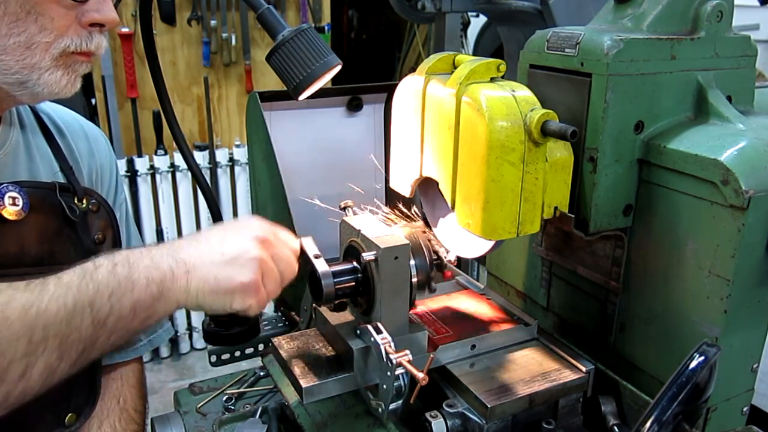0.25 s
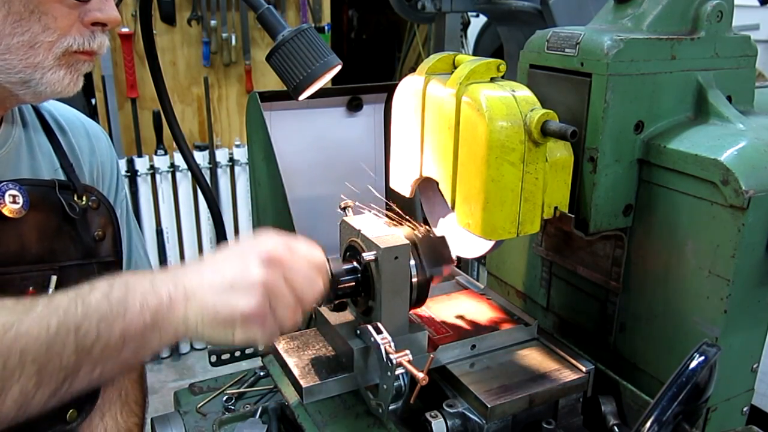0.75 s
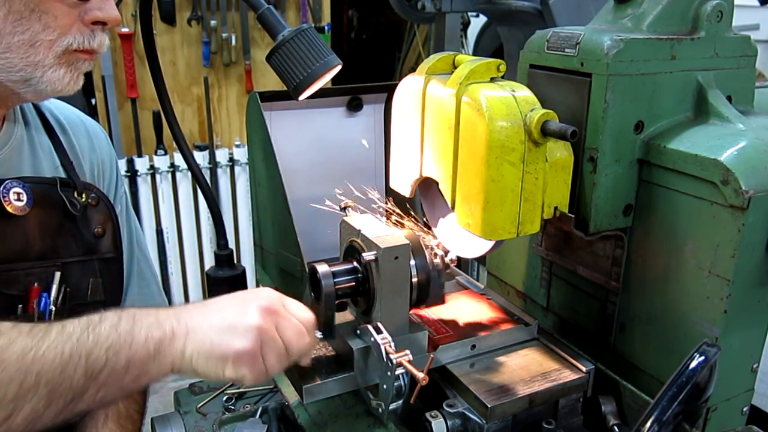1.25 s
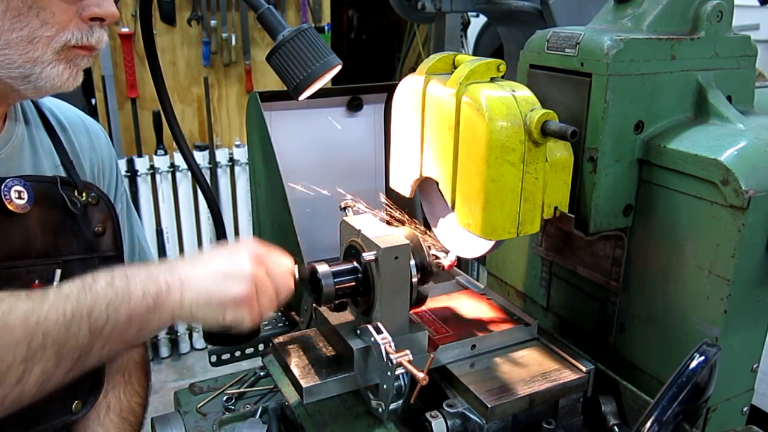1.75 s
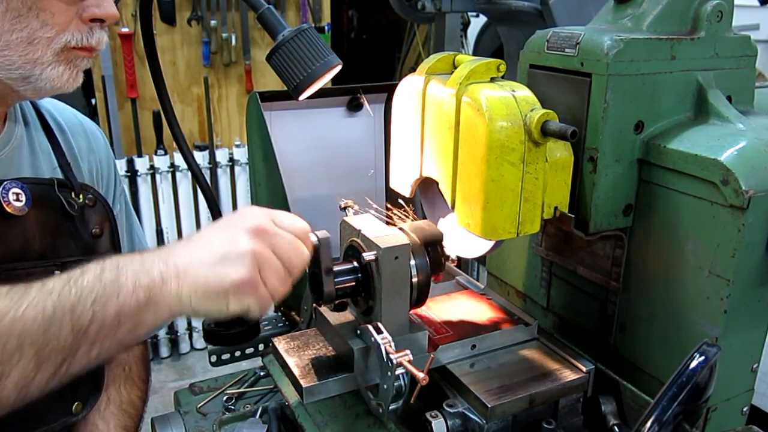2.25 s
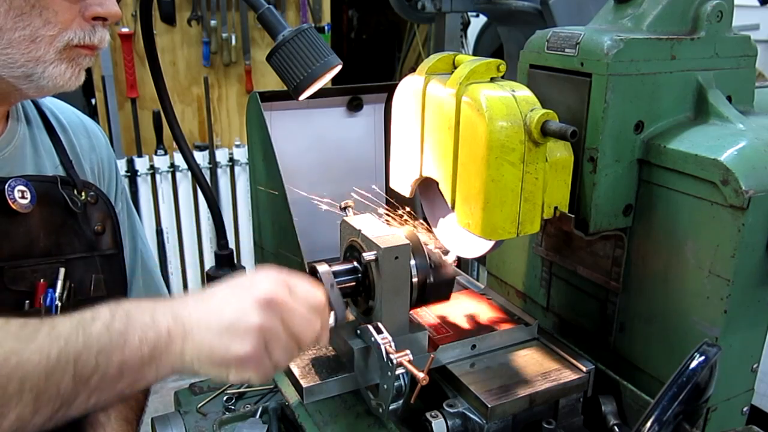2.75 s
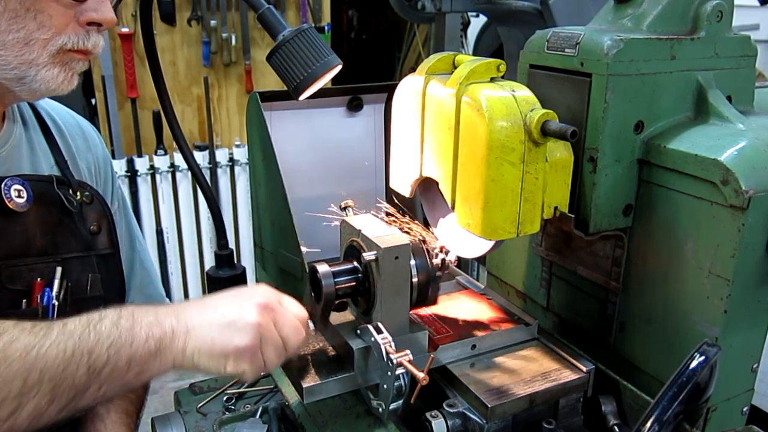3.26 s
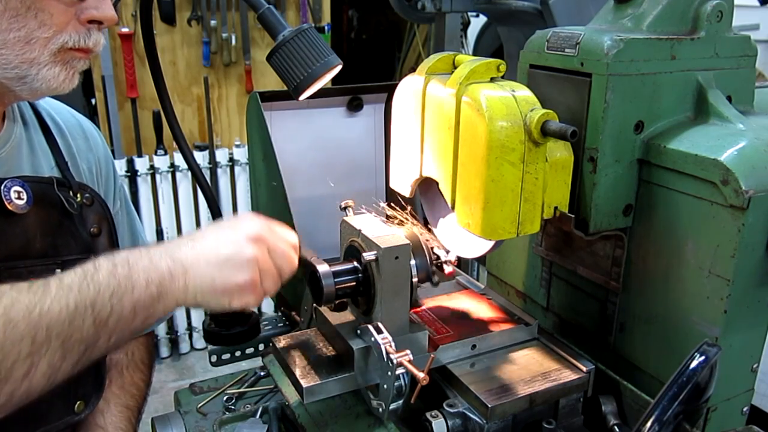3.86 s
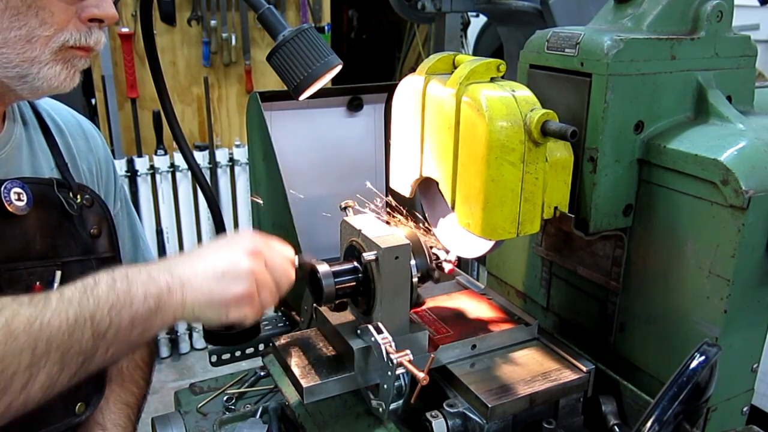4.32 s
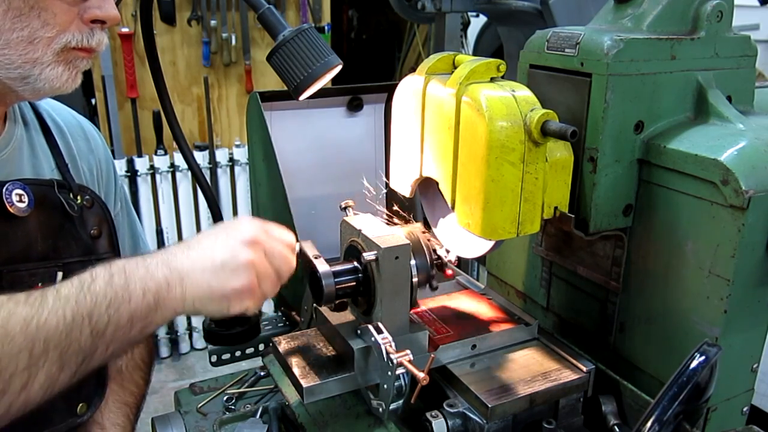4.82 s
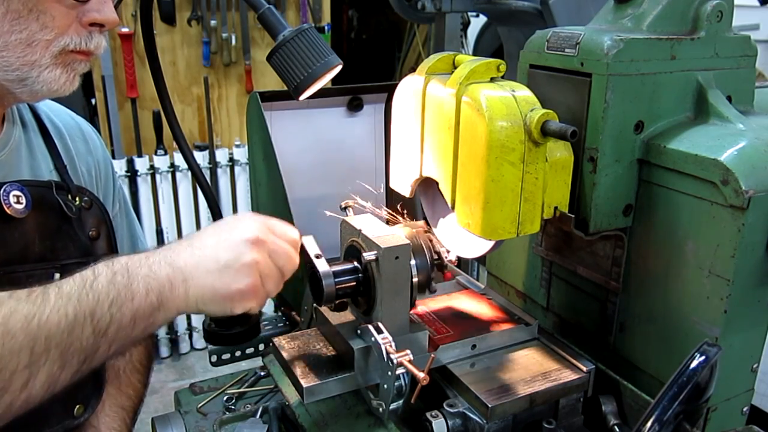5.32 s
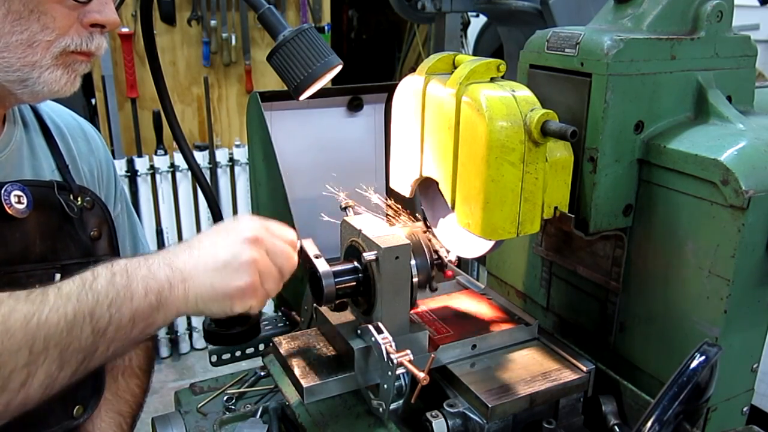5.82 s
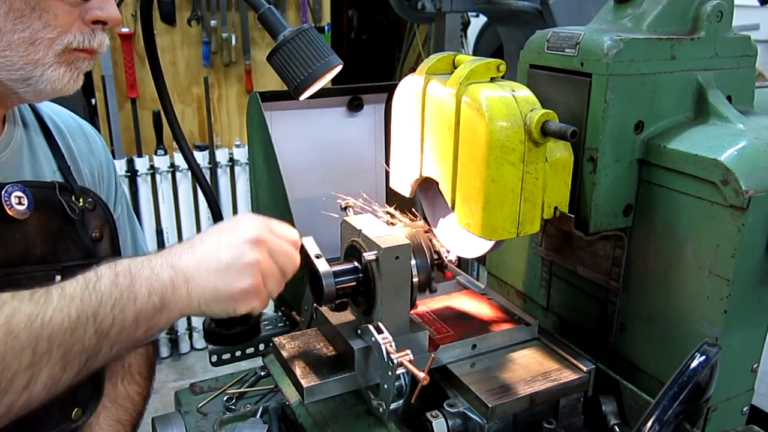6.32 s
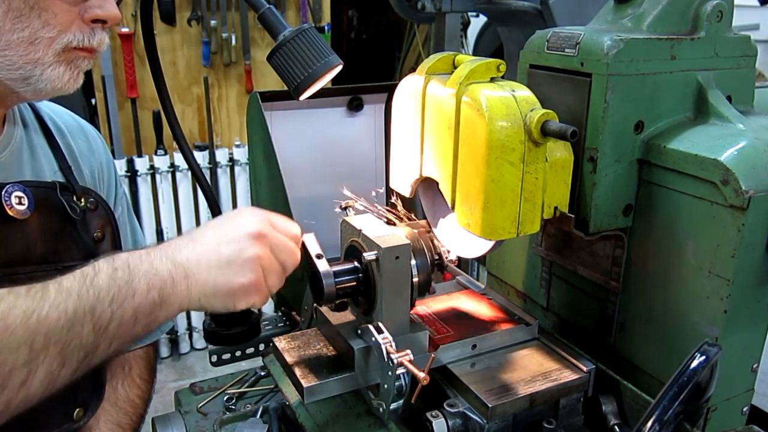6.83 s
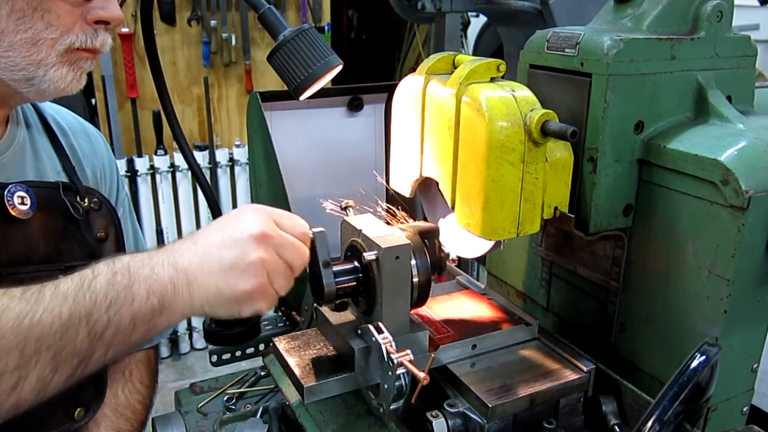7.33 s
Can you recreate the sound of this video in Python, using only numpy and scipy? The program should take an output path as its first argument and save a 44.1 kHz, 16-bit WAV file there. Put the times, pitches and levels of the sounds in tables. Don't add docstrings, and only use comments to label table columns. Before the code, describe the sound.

Constant gear whine of a grinding machine, with a bright metallic grinding hiss that pulses about twice a second over low workshop rumble.

```python
import sys
import numpy as np
from scipy import signal
from scipy.fft import rfft, irfft
from scipy.io import wavfile
from scipy.ndimage import uniform_filter1d, map_coordinates

SR = 44100
rng = np.random.default_rng(int(sys.argv[2]) if len(sys.argv) > 2 else 0)


def to_wav(s):
    ch = np.atleast_2d(s).T
    pcm = np.round(np.clip(ch, -1, 1) * 32767)
    wavfile.write(sys.argv[1], SR, pcm.astype(np.int16))


def rack_gain(trim_db):
    fader = np.asarray(trim_db, float)
    return 10 ** (fader / 20)


N = 334278
TIME = np.arange(N) / SR
SIDES = np.array([[.5], [-.5]])
WHEEL_HZ = 59.846


def along(points, hz):
    f, v = np.transpose(points)
    return np.interp(np.log(hz + 1), np.log(f + 1), v)


def wobble(rate_hz):
    return map_coordinates(rng.standard_normal(int(N * rate_hz / SR) + 4), [TIME * rate_hz])


def drift(shape, span):
    z = rng.standard_normal(shape) + 1j * rng.standard_normal(shape)
    for _ in range(2):
        z = uniform_filter1d(z, span, -2, mode="wrap")
    return z / np.sqrt(np.mean(abs(z) ** 2))


def spin(lines, turns, rows, size):
    cycle = irfft(lines, size) * size / np.sqrt(2)
    cycle = np.concatenate([cycle, cycle[..., :1]], axis=-1)
    place = turns % 1 * size
    return np.array([map_coordinates(c, [rows, place], order=1) for c in cycle])


def rush(spectrum, patchy_db):
    # frequency in Hz, correlation from 0 to 1.
    likeness = [(60, 1), (200, 0.86), (600, 1), (1500, 1), (4000, 0.37), (8000, 0.19), (13000, 0.071)]
    z = signal.stft(rng.standard_normal((2, N)), nperseg=512)[2]
    field = uniform_filter1d(rng.standard_normal(z.shape[1:]), 6, 0)
    field = uniform_filter1d(field, 14, 1)
    pair = signal.istft(z * rack_gain(patchy_db * field / field.std()), nperseg=512)[1][:, :N]
    bins_hz = np.fft.rfftfreq(N, 1 / SR)
    angle_rad = np.arccos(np.clip(along(likeness, bins_hz), -1, 1)) / 2
    colour = rack_gain(along(spectrum, bins_hz))
    mid, side = irfft(rfft(pair) * colour * [np.cos(angle_rad), np.sin(angle_rad)], N)
    return np.array([mid + side, mid - side]) / mid.std()


def gears():
    shaft_hz, shaft_mark_s, teeth = 25.1525, .0454, 15
    # order in counts per turn, level in dB, left-right in dB, left lead in rad.
    strong_orders = [(15, -47, -1, -.7), (30, -17, -1, -.2), (31, -40, -2, -.3), (45, -38, -5, 1.3),
                     (46, -27, 0, -1.2), (59, -36, 1, .5), (60, -29, -5, -1.7), (61, -31, 6, -1),
                     (74, -42, -5, -.2), (76, -35, 0, -.1), (88, -40, -7, .8), (89, -34, -4, .2),
                     (90, -41, -7, -.7), (91, -35, -3, .6), (118, -39, -5, 0), (119, -41, 5, .2),
                     (121, -37, -1, -.4), (122, -42, 1, -.6), (123, -41, 1, -.2), (129, -40.5, 0, 0),
                     (134, -42, 1, .1), (136, -37, 0, 0), (137, -40, 0, 0), (151, -39, 3, .2),
                     (152, -40, -2, -.3), (193, -41, 1, -.3), (207, -42, 0, -1.2), (234, -39, -2, -.6),
                     (236, -43, -3, -.4)]
    # frequency in Hz, level in dB per line.
    weak_orders = [(320, -64), (710, -66), (1190, -57), (1700, -60), (2200, -57), (2600, -54), (3120, -55),
                   (3600, -57), (4200, -55), (4640, -51), (5510, -50), (6520, -54), (7760, -58),
                   (9500, -63)]
    faint_orders = [29, 44, 51, 52, 58, 75, 81, 82, 84, 99, 104, 111, 112, 133, 147, 153, 178, 181, 192,
                    203, 204, 206, 222, 229, 230, 231, 233, 235, 237, 281]
    throb_places = [(.2, 0), (.2, 0), (.04, .23), (.69, -.06), (.46, -.14), (.36, .24), (.53, .58), (.3, 0),
                    (-.22, -.03), (.21, -.21), (.41, -.2), (0, 0)]

    order = np.arange(620)
    luck = rng.standard_normal((len(order), 4))
    level_db = along(weak_orders, order * shaft_hz) + 4 * luck[:, 0]
    level_db -= .05 * np.maximum(order - 380, 0)
    level_db[:8] = -120
    pan_db = -1 + 3 * luck[:, 1]
    lead_rad = 0.61 * luck[:, 2]
    scatter_turns = 1.0 * luck[:, 3]
    level_db[faint_orders] = -46.5 + 0.9 - 0.7 * luck[faint_orders, 0]
    scatter_turns[faint_orders] *= order[faint_orders] > 160
    for count, db, pan, rad in strong_orders:
        k = int(count)
        level_db[k] = db + min(k / 110, 1.8)
        pan_db[k], lead_rad[k] = pan, rad
        scatter_turns[k] *= k > 160

    family = np.round(order / teeth).astype(int)
    place, slant = np.take(throb_places, family, axis=0, mode="clip").T
    sideband = order - teeth * family
    in_family = (sideband >= -1) & (sideband <= 3)
    delay_turns = np.where(in_family, place + slant * sideband, -.05)
    phase = 2 * np.pi * (np.cumsum(delay_turns) + scatter_turns)
    pair = rack_gain(level_db + SIDES * pan_db) * np.exp(1j * SIDES * lead_rad)
    lines = pair * np.exp(1j * (phase - np.angle(pair.sum(0))))

    turns = shaft_hz * (TIME - shaft_mark_s) + 0.00037 * wobble(3.01) + 0.00008 * wobble(30)
    whine = spin(np.repeat(lines[:, None], 2, axis=1), turns, np.zeros(N), size=32768)
    return whine * rack_gain(0.11 * wobble(18) + 0.18 * wobble(120))


def grind():
    # start in seconds, bite in dB, brightness in dB, rising from none at the
    crank_turns = [(.04, 0, 0), (.445, 1.5, -0.5), (.825, 1, -2), (1.21, 2, 0), (1.615, -0.4, 2.5),
                   (1.995, 0.5, -2), (2.375, 1.8, -0.5), (2.775, 1, .3), (3.16, 1, -0.5), (3.65, -1, 2),
                   (4.125, 3, -2.5), (4.6, -2.5, 1), (5.09, 0, -3), (5.575, -1, -2), (6.085, 3, 2),
                   (6.585, 1, 1.5), (7.04, -1, .3), (7.495, -0.5, 0.5)]
    # wheel order, angle in turns, peak in dB,
    # width in turns, spread in orders.
    swells = [(78, .3, -33.5, .16, .9), (78, .73, -37, .2, .8), (92, .12, -26, .13, .75),
              (92, .66, -26, .19, .75), (93.3, .01, -35, .16, 1.4), (92.8, .5, -33, .15, 1.0),
              (95.1, .37, -35, .11, 1.1), (97.6, .33, -32.5, .12, 1.2), (98.2, .89, -34.5, .16, 1.7),
              (108.3, .89, -37, .1, 1.1), (114.8, .33, -38, .16, 1.5), (115, .8, -33, .2, 1.3),
              (118, .17, -41, .18, 2.2), (119.5, .66, -41, .15, 4), (123, .11, -36.5, .1, 3.5),
              (134.9, .01, -32, .12, 1.0), (135, .21, -39, .06, .7), (141.3, .83, -40, .13, 1.3),
              (144.9, .48, -33, .09, 1.2), (144.5, .7, -32.5, .11, 1.6), (152.2, .27, -29.5, .1, .9),
              (152.2, .7, -33.5, .15, .9), (152, .91, -37, .1, .6), (180, .7, -40, .2, .6)]
    # frequency in Hz, level in dB per line.
    grit_levels = [(100, -70), (300, -58.5), (1200, -52.5), (3200, -49.5), (4500, -51), (5700, -59),
                   (7000, -50.5), (9000, -47.5), (11000, -75), (13000, -64), (15000, -70)]
    ringing_hz = [5500, 8900]
    steps, size = 40, 256
    sag_orders_per_turn, swell_pan_db, fresh_db = 1.6, 2.0, 2.1

    start_s, bite_db, bright_db = np.transpose(crank_turns)
    before_s, after_s = 2 * start_s[0] - start_s[1], 2 * start_s[-1] - start_s[-2]
    knots_s = np.concatenate([[before_s], start_s, [after_s]])
    knots = np.arange(len(knots_s))
    grid = np.arange(knots[-1] * steps + 2) / steps
    order = np.arange(size)
    order_hz = order * WHEEL_HZ

    repeating = drift((2, steps, size), 4)[:, np.arange(len(grid)) % steps]
    changing = drift((2, len(grid), size), 3)
    lines = rack_gain(along(grit_levels, order_hz)) * (0.72 * repeating + 0.45 * changing)
    lines[1] = 0.54 * lines[0] + 0.85 * lines[1]

    wander_rad = .36 * np.cumsum(drift((len(grid), size), 4).real, axis=0)
    wander = np.exp(1j * wander_rad + 2j * np.pi * rng.random(size))
    wander *= np.exp(-2j * np.pi * 1.7 * grid)[:, None]
    fresh = rack_gain(fresh_db * drift((len(grid), size), 8).imag + 1.1) * wander
    swell_luck = rng.standard_normal((len(swells), 2))
    for (centre, at, db, width, spread), (pan, lead) in zip(swells, swell_luck):
        away = ((grid - at + .5) % 1 - .5)[:, None]
        near = slice(int(centre) - 9, int(centre) + 10)
        offset = order[near] - centre + sag_orders_per_turn * away
        lobe = np.exp(-2.1 * (away / width) ** 2 - (offset / spread) ** 2)
        pair = rack_gain(db + SIDES * swell_pan_db * pan) * np.exp(SIDES * 0.74j * lead)
        lines[..., near] += pair[..., None] * lobe * fresh[:, near]

    height = np.interp(order_hz, ringing_hz, [0, 1])
    bite = np.interp(grid, knots[1:-1], bite_db)[:, None]
    bright = np.outer(np.interp(grid, knots[1:-1], bright_db), height)
    lines *= rack_gain(bite + bright)
    lines[..., 0] = 0
    wheel_turns = WHEEL_HZ * TIME + 0.0004 * wobble(1.84)
    return spin(lines, wheel_turns, np.interp(TIME, knots_s, knots) * steps, size=4096)


def hum():
    # frequency in Hz, level in dB; the last is the wheel's 249th harmonic.
    machine_tones = [(59.9, -52.0), (179.5, -60), (239.4, -56), (359.3, -50.0), (520.2, -50.0),
                     (1037.6, -53.0), (1071.9, -53.0), (1095.5, -52.0), (1166.8, -52.0), (1191.7, -40.0),
                     (1197.1, -52.0), (1216.6, -45.0), (1226.7, -52.0), (1274.5, -49.0), (1376.8, -51.0),
                     (1389.6, -50.0), (1401.7, -51.0), (1414.5, -49.0), (1436.7, -46.0), (1569.2, -51.0),
                     (1594.1, -52.0), (3103.5, -52.0), (3112.2, -51.0), (3172, -47), (3351.8, -45.0),
                     (14902, -51.5)]
    wheel_tones = [(13 * WHEEL_HZ, -45), (204 * WHEEL_HZ, -54), (248.6 * WHEEL_HZ, -62)]
    total = np.zeros((2, N))
    for hz, db in [*machine_tones, *wheel_tones]:
        lead_rad = SIDES * rng.normal(0, 0.66) * min(hz / 1000, 1)
        level = rack_gain(db + 2.5 + 1.0 * wobble(5.4))
        total += level * np.sin(2 * np.pi * hz * TIME + .5 * wobble(2.93) + lead_rad)
    return total


def hiss():
    # frequency in Hz, level in dB per Hz.
    grit_noise = [(900, -25), (1150, 1.5), (1500, 1.5), (1750, -13.5), (2250, -1), (3200, -5),
                  (4100, -11.5), (5700, 4), (6300, 0), (9000, -5), (13000, -6), (14300, -15.5),
                  (15700, -24)]
    wheel_rad = 2 * np.pi * WHEEL_HZ * TIME
    pulse = 1 + 0.28 * np.cos(wheel_rad) + 0.13 * np.cos(2 * wheel_rad)
    return rack_gain(-28.5 + 0.25 * wobble(10)) * pulse * rush(grit_noise, patchy_db=2.5)


def shop():
    # frequency in Hz, level in dB per Hz.
    room_noise = [(20, -17), (90, -15.5), (130, -9.5), (200, -18), (370, -4), (460, -7), (700, -3.5),
                  (755, 2), (810, -2.5), (950, -7), (1100, -26)]
    return rack_gain(-37.5 + 0.89 * wobble(3.06)) * rush(room_noise, patchy_db=0.0)


def scene():
    return gears() + grind() + hum() + hiss() + shop()


def band_limit(x):
    return signal.sosfilt(signal.butter(12, 15670, fs=SR, output="sos"), x)


def record(dry):
    # frequency in Hz, level in dB, left-right in dB.
    mic_colour = [(11000, 0, 0), (11900, -3, 1), (13400, 0, 3), (13700, -7, 3), (14100, 0, 3),
                  (14950, 4, 4), (15200, -11, 2), (15650, -7, 0)]
    # time in seconds, level of the main whine in dB.
    gain_ride = [(0.0, -17), (0.34, -17), (0.42, -18.5), (0.89, -17), (1.24, -18), (1.94, -16.5),
                 (2.0, -19), (2.24, -18), (4.52, -17.5), (5.62, -16.5), (6.19, -19), (6.38, -18),
                 (7.5, -18), (7.58, -17.5)]
    hz, level_db, pan_db = np.transpose(mic_colour)
    bins_hz = np.fft.rfftfreq(N, 1 / SR)
    colour_db = np.interp(bins_hz, hz, level_db) + SIDES * np.interp(bins_hz, hz, pan_db)
    heard = irfft(rfft(dry) * rack_gain(colour_db), N)
    gain_s, ride_db = np.transpose(gain_ride)
    gain_db = np.interp(TIME, gain_s, ride_db)
    return band_limit(heard * rack_gain(gain_db - gain_db.mean()))


dry = scene()
out = record(dry)
to_wav(out)
```